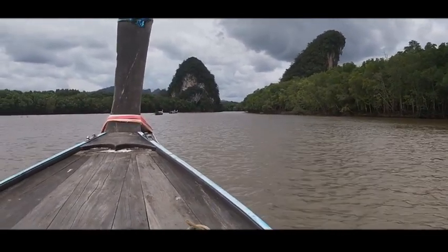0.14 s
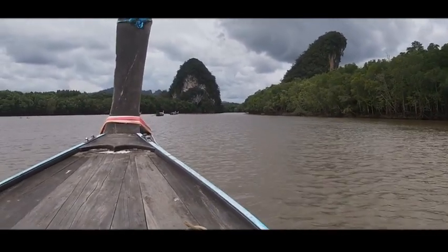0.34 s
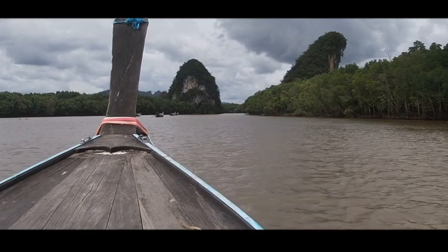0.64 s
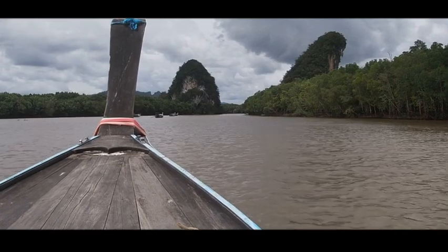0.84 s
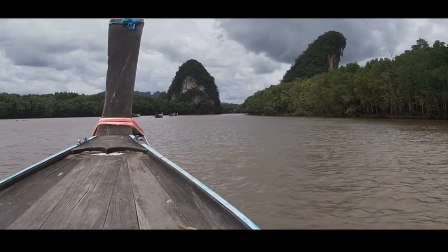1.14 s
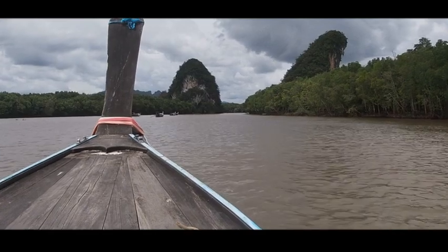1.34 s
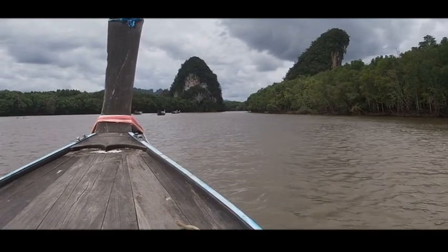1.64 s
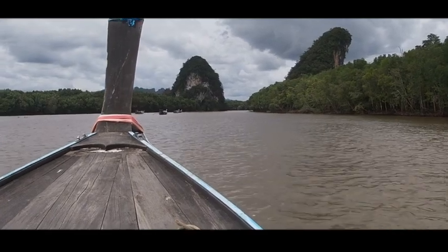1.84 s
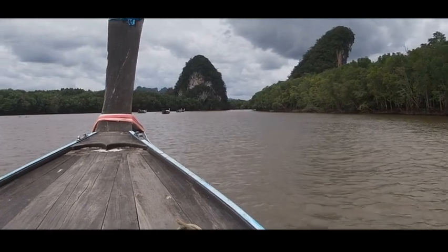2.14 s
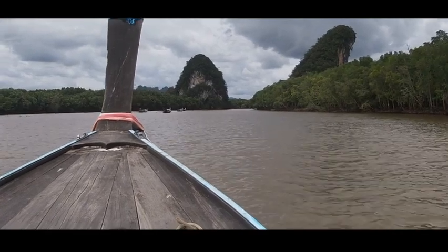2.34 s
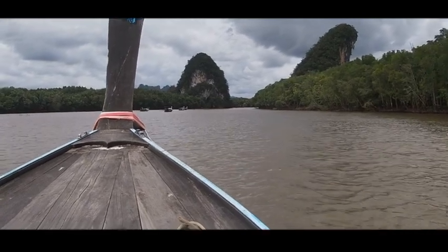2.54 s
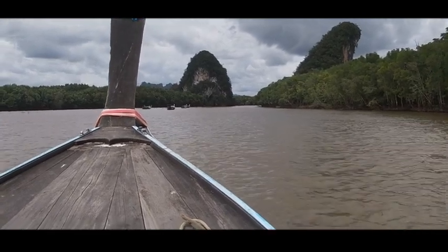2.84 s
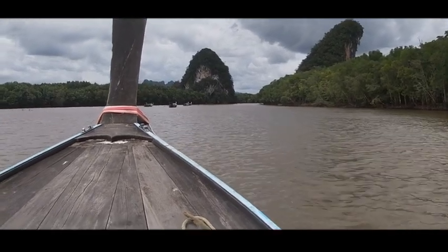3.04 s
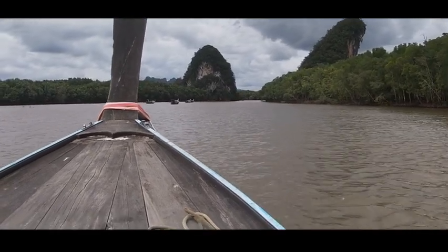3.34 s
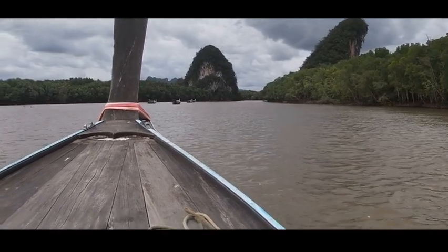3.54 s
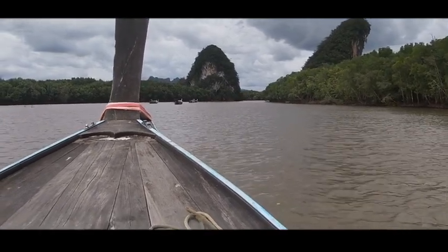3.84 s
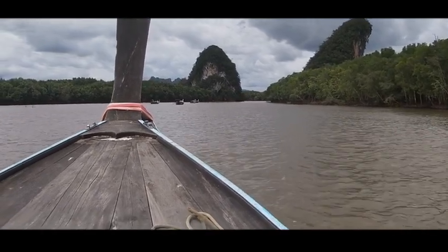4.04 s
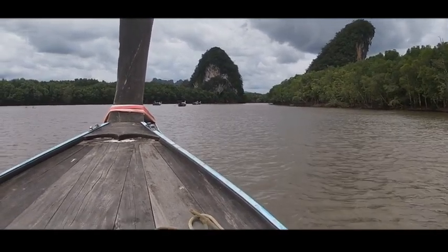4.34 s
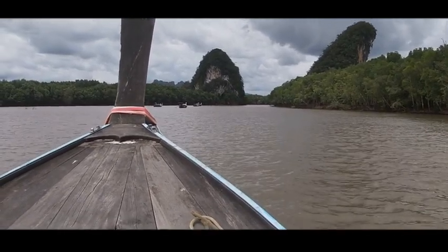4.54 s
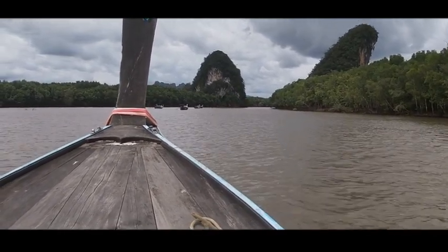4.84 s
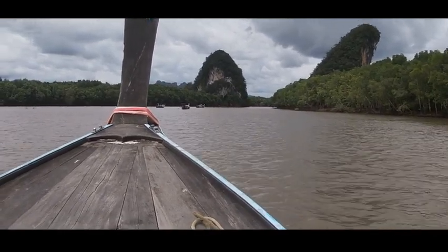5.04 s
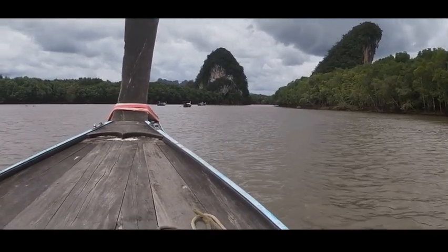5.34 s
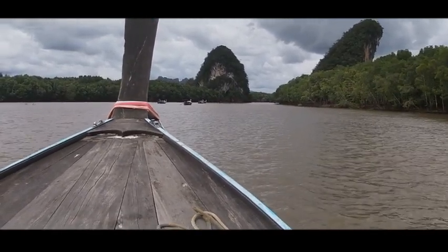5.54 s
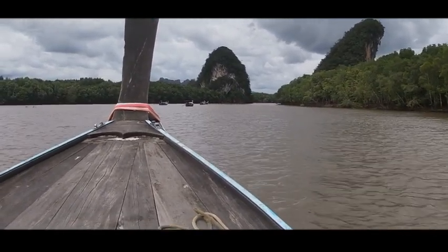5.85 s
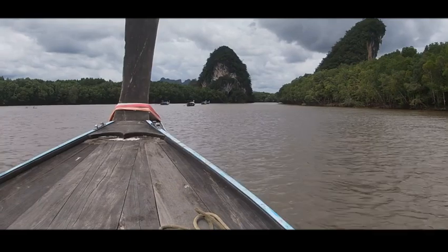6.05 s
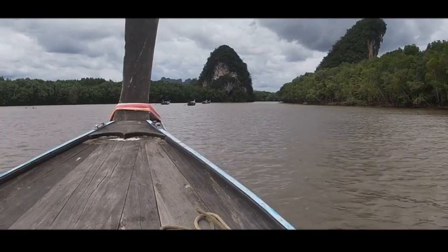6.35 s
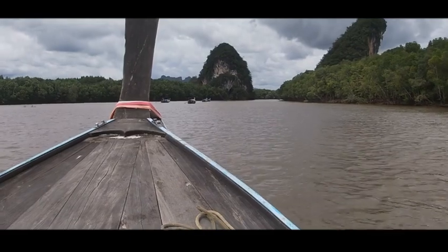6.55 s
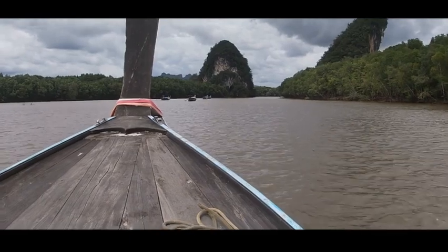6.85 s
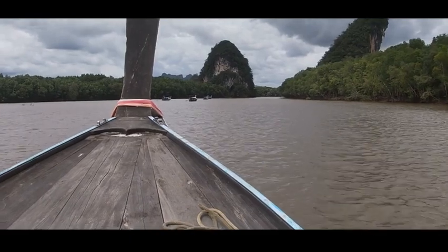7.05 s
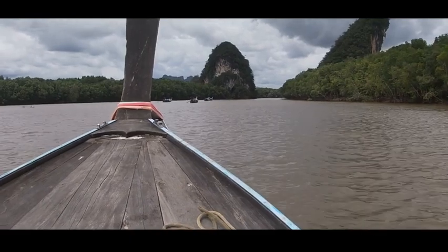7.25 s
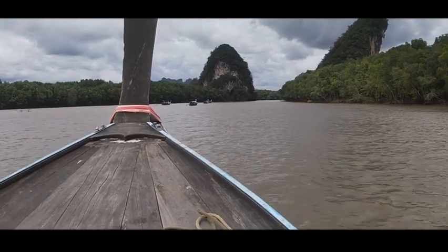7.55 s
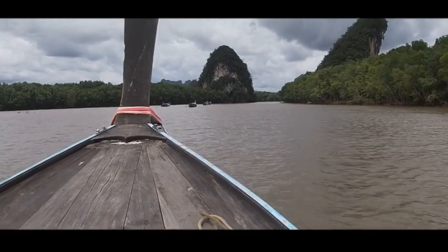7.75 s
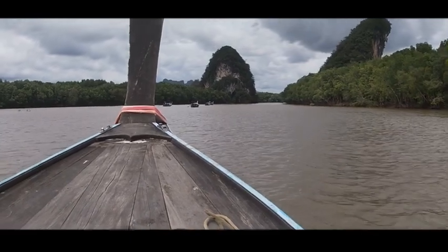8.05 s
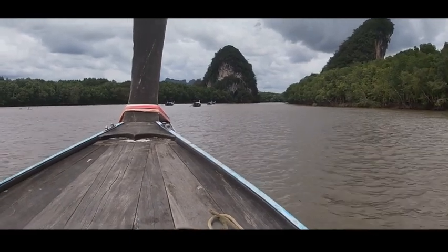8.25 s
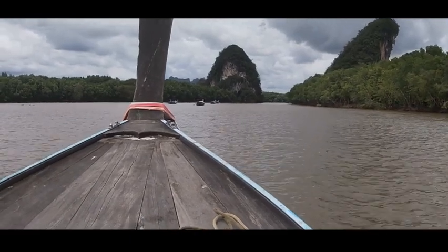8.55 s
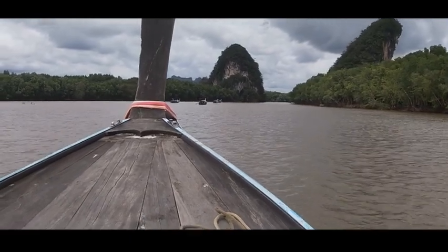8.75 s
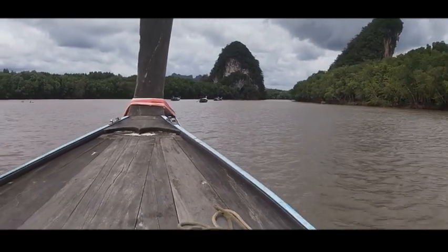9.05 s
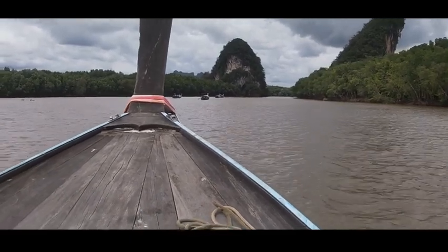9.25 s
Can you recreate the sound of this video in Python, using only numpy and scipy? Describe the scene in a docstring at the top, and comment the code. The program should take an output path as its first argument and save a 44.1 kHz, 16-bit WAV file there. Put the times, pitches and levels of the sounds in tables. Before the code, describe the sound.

Continuous low chugging hum of a boat's diesel motor on a river, hull rumbling and valves rattling, with a faint high bird whistle at the very end.

```python
"""A four-cylinder diesel drives a wooden boat up a river, heard from the bow.
From the start its orders drone as harmonics of the engine cycle, and propeller side tones beat against
them. Shaped noise gives the rumble of planks and panels, the valve cover's clatter, and the hiss of
exhaust and water. From 9.25 s a far bird whistles: one trembling sine."""
import sys
import numpy as np
from scipy import signal
from scipy.fft import rfft, irfft
from scipy.io import wavfile
from scipy.ndimage import uniform_filter1d

SR = 44100
rng = np.random.default_rng(int(sys.argv[2]) if len(sys.argv) > 2 else 0)


def log_audio(samples):
    """Write samples as a 16-bit WAV file to the path given in sys.argv[1]."""
    # one column per channel
    frames = np.atleast_2d(samples).T
    # limit to full scale, then quantise
    limited = np.clip(frames, -1, 1)
    pcm = np.round(limited * 32767).astype(np.int16)
    wavfile.write(sys.argv[1], SR, pcm)


N = 414981
T = np.arange(N) / SR  # time, s

# Four-stroke engine speed: start_s, rate_cycles_per_s
ENGINE_SPEED = [(0.0, 14.335), (0.4, 14.346), (1.2, 14.275), (2.0, 14.357), (2.8, 14.318), (3.2, 14.373),
                (4.4, 14.397), (5.3, 14.397), (5.6, 14.375), (6.2, 14.452), (6.8, 14.48), (7.2, 14.517),
                (7.8, 14.53), (8.5, 14.597), (9.41, 14.632)]
START_TURN = .2  # cycles: the first one is already under way
CRUISE = 14.4  # cycles per s, where the tuning by speed is zero

# Engine orders; every 4th is a firing order, the rest come from uneven cylinders:
# order (multiple of the cycle rate), level_db (rms, before its waver)
ENGINE_ORDERS = [(2, -35), (3, -33.1), (4, -19.8), (5, -32.2), (6, -21.8), (7, -37.2), (8, -15.5),
                 (9, -24.6), (10, -29.9), (11, -39.2), (12, -25.9), (13, -43.1), (14, -42.4), (15, -41.7),
                 (16, -29.9), (17, -30.4), (18, -33.8), (19, -33.6), (20, -30.6), (21, -32.8), (22, -39.2),
                 (23, -39.9), (24, -37.2), (25, -43.1), (26, -44.9), (27, -43.4), (28, -37.3), (29, -50.6),
                 (30, -47.7), (31, -47.3), (32, -45.9), (35, -52.5), (36, -44.0), (40, -41.5), (41, -51.5),
                 (42, -52.5), (43, -50.4), (44, -51.8), (48, -52), (50, -54)]
# Phase lag of the orders 4n, 4n + 1, 4n + 2, 4n + 3: lag_turns
CYLINDER_LAG = [-.04, .38, .03, -.15]
CHUG_ORDERS = range(16, 24)  # the hull's 230-340 Hz range, struck by one strong cylinder
# Hull response at four strong orders, added to their levels:
# order, gain_at_cruise_db, slope_db (per cycle/s of speed), waver_db (rms)
HULL_TUNING = [(6, 0.5, -16, 1.3), (8, 0.97, 9.5, 0.43), (12, 0.76, -23.5, 2.1), (16, -1.1, 15.5, 2.8)]
WAVER_HZ = 3.6
# Brief level changes of the eighth- and sixth-order hums: center_s, eighth_order_db, sixth_order_db
HUM_DIPS = [(2.65, -9, 3), (3.0, -2.5, -3), (3.7, -7.5, -0.5), (4.6, -4.5, 1.5), (5.2, -4.5, 1),
            (5.8, -6.5, 3.5), (6.6, -6, -20), (8.0, 0, -10)]
DIP_S = 0.12  # standard deviation of each bell-shaped change, s

PROPELLER_BEATS = 1.55  # mean propeller beats per engine cycle
# Side tones where the propeller load swings an order:
# order, side (signed multiple of the beat), level_db (rms, before its waver)
SIDE_TONES = [(4, 0.88, -30.5), (6, 0.97, -27), (8, -1.1, -36.5), (8, 0.98, -28), (12, -1.2, -42.5)]

# Rumble spectrum of the planks, before its swell: frequency_hz, density_db (per Hz)
HULL_SPECTRUM = [(12, -65.5), (35, -57), (50, -52), (65, -38.5), (100, -46), (125, -37.5), (150, -39.5),
                 (165, -49), (300, -48), (350, -52.5), (375, -54.5), (620, -62), (1500, -100), (4000, -150)]
# Ringing panels of hull and block: frequency_hz, width_hz, level_db (rms, before the swell)
PANEL_MODES = [(253.6, 21.6, -30), (331, 15.3, -33.5), (466, 8.3, -47), (583.4, 66, -38.5), (728, 62, -53),
               (863, 41, -43.5), (921, 58, -45), (1026.5, 11, -49.5), (1220, 30, -66.5), (1288, 67, -48.5),
               (1375, 28, -53.5), (1940, 80, -53), (2293, 74, -53.5), (2870, 190, -51), (3474, 67, -64),
               (4530, 50, -71), (4960, 40, -64.5), (5380, 320, -56), (5800, 140, -65.5), (6500, 80, -83),
               (6830, 80, -69.5), (7450, 100, -70)]
# Slow swell of the noise layers: start_s, rumble_db, hiss_db
NOISE_SWELL = [(0.0, 3.5, -0.8), (0.8, 2.5, 0), (2.2, 1.3, -0.2), (2.85, 5, 0.7), (3.4, 0.5, 0.5),
               (4.0, 4, 0.4), (4.7, 2.5, 0.2), (5.4, 2, 0.6), (6.1, 2, 0), (6.8, 3, 0.3), (7.7, 2.3, -0.4),
               (8.6, 0.5, 0.4), (9.41, 1.2, -0.5)]

# Valve cover modes: frequency_hz, width_hz, level_db (relative to one another)
COVER_MODES = [(1483, 80, 2), (1550, 130, 0), (1632, 64, -8.5)]
# Loudness of the clatter: start_s, level_db (rms)
CLATTER_LEVEL = [(0.0, -35), (0.4, -37), (1.4, -40.5), (2.55, -37), (2.9, -35.5), (3.2, -39), (3.7, -37.5),
                 (4.2, -36), (4.6, -33.5), (5.6, -36), (6.7, -34), (7.2, -35.5), (7.5, -37), (8.4, -36),
                 (9.0, -38.5), (9.41, -34.5)]

# Exhaust and water spectrum, before streaks and swell: frequency_hz, density_db (per Hz)
HISS_SPECTRUM = [(400, -65.5), (700, -61), (950, -62), (1180, -65.5), (1900, -70), (2600, -73), (3200, -75),
                 (5000, -81.5), (6000, -83), (7000, -92), (8200, -95), (9200, -92), (10300, -99),
                 (11800, -100), (13200, -105), (14400, -116)]
# Bird whistle: start_s, pitch_hz, level_db (rms, before its tremble)
BIRD_WHISTLE = [(9.25, 7760, -66), (9.27, 7740, -60), (9.34, 7750, -57), (9.37, 7770, -51),
                (9.41, 7800, -51)]

CEILING = 1.02  # limit that the rounded peaks approach, full scale = 1
EDGE_HZ = 14357  # upper band limit


def amp(db):
    """Level law: 20 dB is a factor of ten in amplitude."""
    return 10 ** (np.asarray(db) / 20)


def evened(x):
    """Normalization: dividing by the root mean square gives rms 1."""
    return x / np.sqrt(np.mean(x ** 2) + 1e-20)


def read(points, hz):
    """Spectral interpolation: values join linearly on a log-frequency axis."""
    f, value = np.transpose(points)
    return np.interp(np.log(hz + 1), np.log(f + 1), value)


def curve(rows, axis):
    """Linear interpolation: one column of a table becomes a course over time."""
    columns = np.transpose(rows)
    return np.interp(T, columns[0], columns[axis])


def wander(hz):
    """Slow random fluctuation: low-passed noise of rms about 1, with changes up to about hz."""
    coarse = rng.standard_normal(N // 441 + 402)  # 100 values per s
    low_pass = signal.butter(2, np.clip(hz / 50, .001, .9))
    smooth = signal.lfilter(*low_pass, coarse)[400:]  # past the filter's onset
    return np.interp(T, np.arange(len(smooth)) / 100, evened(smooth))


def ringing(modes):
    """Resonance: broadband noise excites damped modes, each a spectral peak with its own rms level."""
    hz = np.fft.rfftfreq(N, 1 / SR)
    power = sum(amp(db) ** 2 / width / (1 + (2 * (hz - f) / width) ** 2) ** 2
                for f, width, db in modes)
    return irfft(rfft(rng.standard_normal(N)) * np.sqrt(power * 2 * SR / np.pi), N)


def cycles():
    """Phase is the integral of speed: engine cycles completed, with a slight hunting of the governor."""
    rate = curve(ENGINE_SPEED, axis=1) * (1 + .0004 * wander(hz=3))
    return START_TURN + np.cumsum(rate) / SR


def drone(turns):
    """Harmonic synthesis: periodic firing gives tones at multiples of the cycle rate."""
    rise = curve(ENGINE_SPEED, axis=1) - CRUISE
    tuning_db = {}
    for order, cruise_db, slope_db, spread_db in HULL_TUNING:
        tuning_db[int(order)] = cruise_db + slope_db * rise + spread_db * wander(hz=WAVER_HZ)
    for center, eighth_db, sixth_db in HUM_DIPS:
        bell = np.exp(-.5 * ((T - center) / DIP_S) ** 2)
        tuning_db[8] = tuning_db[8] + eighth_db * bell
        tuning_db[6] = tuning_db[6] + sixth_db * bell
    out = np.zeros(N)
    for order, db in ENGINE_ORDERS:
        drift_db = 1.2 * wander(hz=2)
        slip = .03 * wander(hz=1)  # turns
        # unlike exhaust paths give a lag that repeats every 4 orders
        lag = CYLINDER_LAG[int(order) % len(CYLINDER_LAG)]
        if order in CHUG_ORDERS:
            lag = .31 - .035 * order  # a linear phase lines these up into one thud a cycle
        level = amp(db + tuning_db.get(order, drift_db))
        out += level * np.cos(2 * np.pi * (order * turns - lag + slip))
    return np.sqrt(2) * out  # rms to peak


def propeller(turns):
    """Modulation sidebands: tones beside the orders, less steady as the blades bite uneven water."""
    blades = PROPELLER_BEATS * turns + .12 * wander(hz=1.5)
    out = np.zeros(N)
    for order, side, db in SIDE_TONES:
        level = amp(db + 2.2 * wander(hz=1.7))
        out += level * np.cos(2 * np.pi * (order * turns + side * blades))
    return np.sqrt(2) * out


def rumble(turns):
    """Filtered noise and resonance: planks rumble and panels ring, pumped a little by each cycle."""
    hz = np.fft.rfftfreq(N, 1 / SR)
    spectrum = rfft(rng.standard_normal(N)) * amp(read(HULL_SPECTRUM, hz))
    planks = irfft(spectrum * np.sqrt(SR / 2), N)
    pump_db = 0.16 * np.cos(2 * np.pi * (turns + .03))
    return (planks + ringing(PANEL_MODES)) * amp(curve(NOISE_SWELL, axis=1) + pump_db)


def clatter(turns):
    """Amplitude-modulated resonance: the valve cover rings with each firing, some cylinders louder."""
    firing_db = 1.0 * np.cos(8 * np.pi * (turns - .16))  # four firings a cycle
    uneven_db = .8 * np.cos(2 * np.pi * (turns - .03))
    bursts = ringing(COVER_MODES) * amp(firing_db + uneven_db + 1.1 * wander(hz=23))
    return amp(curve(CLATTER_LEVEL, axis=1)) * evened(bursts)


def hiss(turns):
    """Time-varying noise spectrum: streaks come and go in the treble, lightly pumped by the firings."""
    frames, hz = N // 512 + 5, np.fft.rfftfreq(2048, 1 / SR)
    real, imaginary, streaks, patches = rng.standard_normal((frames, 1025, 4)).T
    # axis 0 is frequency, axis 1 is time: streaks are narrow and long, patches wide and short
    streaks = uniform_filter1d(uniform_filter1d(streaks, size=2, axis=0), size=70, axis=1)
    patches = uniform_filter1d(uniform_filter1d(patches, size=30, axis=0), size=5, axis=1)
    # streak depth: (Hz, dB rms)
    depth_db = read([(1500, 1.6), (5000, 3.4), (10000, 2.05)], hz)[:, None]
    level_db = read(HISS_SPECTRUM, hz)[:, None] + depth_db * evened(streaks) + 0.2 * evened(patches)
    spectrum = (real + 1j * imaginary) * amp(level_db)
    noise = signal.istft(spectrum, nperseg=2048, noverlap=1536)[1][:N]
    noise = np.sqrt(SR / 2 / (2048 / 3)) * noise  # level per Hz
    pump_db = 0.13 * np.cos(8 * np.pi * (turns - .15))
    return noise * amp(curve(NOISE_SWELL, axis=2) + pump_db)


def bird():
    """Pure tone with amplitude modulation: a thin gliding whistle with a light tremble."""
    tone = np.sin(2 * np.pi * np.cumsum(curve(BIRD_WHISTLE, axis=1)) / SR)
    tremble_db = 2.1 * np.sin(2 * np.pi * 35 * T)
    begun = T > BIRD_WHISTLE[0][0]
    return np.sqrt(2) * amp(curve(BIRD_WHISTLE, axis=2) + tremble_db) * tone * begun


def scene():
    """Superposition: the pressures of all sources add at one microphone at the bow."""
    turns = cycles()
    engine = drone(turns) + propeller(turns)
    noises = rumble(turns) + clatter(turns) + hiss(turns)
    return (engine + noises + bird())[None]


def record(dry):
    """Saturation, then band limiting: peaks round off under a soft ceiling before a low-pass."""
    soft = dry / (1 + (dry / CEILING) ** 4) ** .25
    low_pass = signal.firwin(511, EDGE_HZ, window=("kaiser", 9), fs=SR)
    return signal.oaconvolve(soft, low_pass[None], "same")


dry = scene()
out = record(dry)
log_audio(out)
```